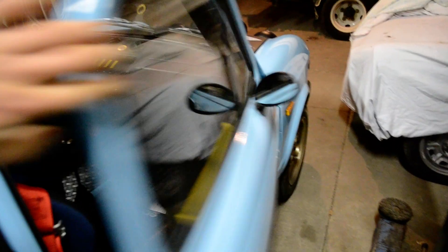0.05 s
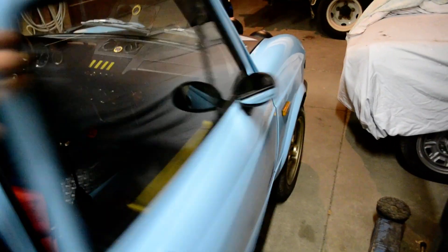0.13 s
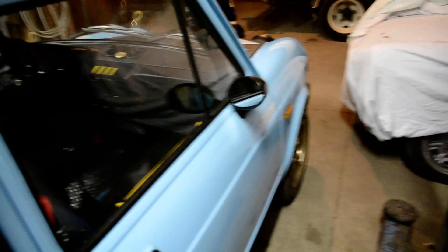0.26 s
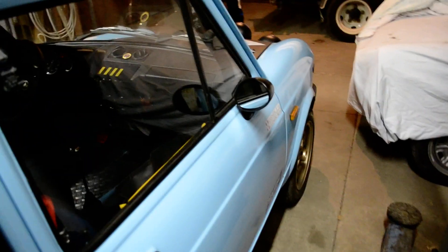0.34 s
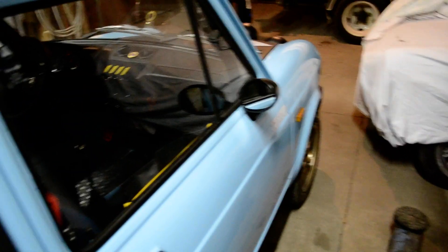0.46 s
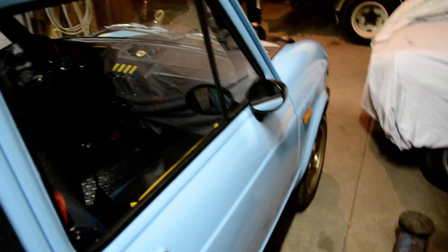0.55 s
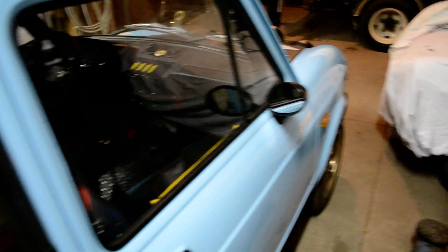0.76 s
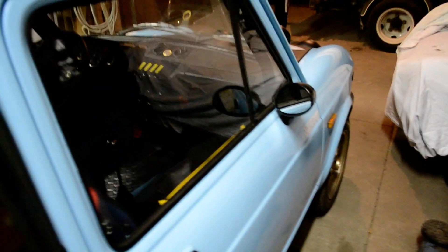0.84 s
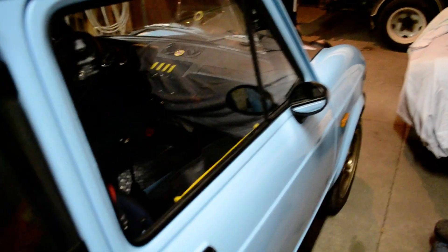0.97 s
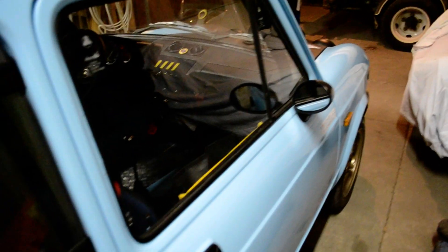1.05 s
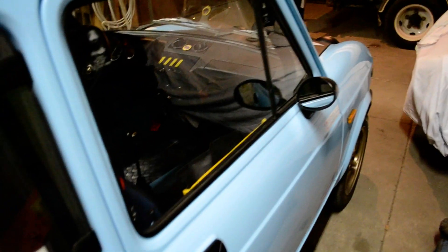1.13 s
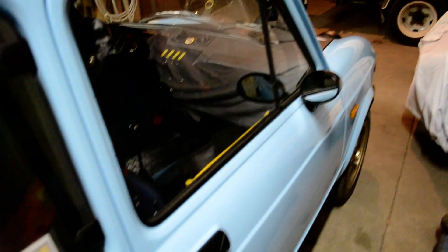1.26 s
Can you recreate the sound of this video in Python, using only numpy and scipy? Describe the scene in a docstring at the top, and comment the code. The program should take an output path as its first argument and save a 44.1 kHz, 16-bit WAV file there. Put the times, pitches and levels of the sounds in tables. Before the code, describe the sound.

One hard slam of a thin steel car door in a garage, close microphone clipping on the peak; rattling trim, boxy ringing body and short reverberation, then near silence with tiny clicks and cloth movement.

```python
"""Car door slam in a garage

A light steel car door is slammed in a concrete garage, heard close by. Seal rub is stick-slip pulses and hiss;
blows, glass and trim rattles and ticks are decaying noise bursts; latch and panels are decaying sines.
Body shudder is noise dying at a different speed per frequency; decaying noise rings out the garage.
One small tick comes before the slam, more after it, with a rustle and crackle of someone shifting nearby,
over faint room hiss. Loud peaks clip."""
import sys
import numpy as np
from scipy import signal
from scipy.fft import rfft, irfft, next_fast_len
from scipy.io import wavfile
from scipy.ndimage import map_coordinates

SR = 44100
rng = np.random.default_rng(int(sys.argv[2]) if len(sys.argv) > 2 else 0)


def invert_db(level):
    """Linear amplitude ratio for a level in decibels (20 dB per decade), elementwise."""
    return 10 ** (np.asarray(level, dtype=float) / 20)


def log_audio(samples):
    """Write samples as a 16-bit WAV file to the path given in sys.argv[1]."""
    # one column per channel
    frames = np.atleast_2d(samples).T
    # limit to full scale, then quantise
    limited = np.clip(frames, -1, 1)
    pcm = np.round(limited * 32767).astype(np.int16)
    wavfile.write(sys.argv[1], SR, pcm)


N = 57330
T = np.arange(N) / SR


def unit(x):
    """Scale to rms 1."""
    return x / np.sqrt(np.mean(x ** 2) + 1e-20)


def along(points, hz):
    """Interpolate (Hz, value) points on a log frequency axis."""
    f, v = np.transpose(points)
    return np.interp(np.log(hz + 1), np.log(f + 1), v)


def filtered(x, response):
    """Multiply the spectrum of x by a response of frequency, zero-padded."""
    m = next_fast_len(N + SR // 2)
    return irfft(rfft(x, m) * response(np.fft.rfftfreq(m, 1 / SR)), m)[:N]


def shaped(x, spectrum):
    """Filter x by (Hz, dB) points."""
    return filtered(x, lambda hz: invert_db(along(spectrum, hz)))


def noise(spectrum):
    """Coloured noise of rms 1."""
    return unit(shaped(rng.standard_normal(N), spectrum))


def grainy(spectrum, grain_db):
    """Coloured noise of rms 1 whose level flickers within milliseconds."""
    flicker = map_coordinates(rng.standard_normal(600), [T * 400])  # 400 random points a second
    return unit(invert_db(grain_db * flicker) * noise(spectrum))


def level(rows):
    """Gain per sample from (s, dB) rows, -150 dB before the first."""
    s, db = np.transpose(rows)
    return invert_db(np.interp(T, s, db, left=-150))


def build_up(rise_s):
    """Exponential approach to 1 with time constant rise_s."""
    return 1 - np.exp(-T / rise_s)


def dying(s, db, t60, rise_s=0.00037):
    """Quick rise at s, then exponential decay."""
    t = np.maximum(T - s, 0)
    return invert_db(db - 60 * t / t60) * (1 - np.exp(-t / rise_s))


def tail(x, t60s):
    """Make each frequency of x die at its own speed from the first sample."""
    hz, t, z = signal.stft(x, SR, nperseg=512)
    decay = invert_db(-60 * t / along(t60s, hz)[:, None])
    return signal.istft(z * decay, SR, nperseg=512)[1][:N]


# Blows of door on frame. Each row: start in seconds, level in dB, t60 in seconds.
BLOWS = [(0.2094, -2, 0.036), (0.2177, -15, 0.018), (0.2247, -13, 0.066), (0.2294, -18.5, 0.01),
         (0.241, -17, 0.11), (.2600, -19.5, 0.066)]
# Colour of the blows. Each row: frequency in Hz, relative level in dB.
STRIKE_SPECTRUM = [(30, -28.5), (200, -15), (487, -10), (800, -2), (1180, -1.5), (1500, -3.5), (1850, -3.5),
                   (2400, -5.5), (2800, -7.5), (3500, -7), (4400, -13.5), (9900, -30), (12000, -48.5)]


def blows():
    """Door striking frame: broadband bursts, each with its own decay."""
    return noise(STRIKE_SPECTRUM) * sum(dying(*row) for row in BLOWS)


def from_first_blow(x):
    """Delay x to the first blow."""
    start = round(BLOWS[0][0] * SR)
    return np.pad(x, (start, 0))[:N]


# Short latch modes. Each row: frequency in Hz, level in dB, t60 in seconds.
LATCH_MODES = [(992, -17, .06), (1207, -9, 0.078), (1720, -10, 0.031), (1959, -12.5, .05), (2402, -12, .05),
               (3343, -8.5, .04), (3646, -23.5, .035)]


def latch():
    """Latch struck at the first blow: brief metallic modes as decaying sines."""
    ring = np.zeros(N)
    for hz, db, t60 in LATCH_MODES:
        envelope = dying(BLOWS[0][0], db + rng.normal(0, 1), t60)
        ring += envelope * np.sin(2 * np.pi * (hz * T + rng.uniform()))
    return ring


# Rattles of glass and trim. Each row: start in seconds, level in dB, t60 in seconds.
RATTLES = [(0.209, -20, 0.026), (0.227, -14.5, 0.01), (0.2386, -11, 0.026), (0.245, -22, 0.046),
           (0.257, -22, 0.028), (0.274, -26, 0.04), (0.312, -25.5, 0.048), (0.329, -28.5, 0.042)]
# Colour of the rattles. Each row: frequency in Hz, relative level in dB.
TRIM_SPECTRUM = [(2500, -26.5), (4000, 2), (5500, 4), (7500, 0), (9500, -2.5), (11500, -21.5),
                 (13000, -52.5)]


def rattles():
    """Loose glass and trim: bright decaying bursts."""
    return noise(TRIM_SPECTRUM) * sum(dying(*row) for row in RATTLES)


# Colour of the body vibration. Each row: frequency in Hz, relative level in dB.
SHUDDER_SPECTRUM = [(15, -51.5), (25, -25.5), (223, -7), (304, -7), (448, -4), (509, -11), (550, -5.5),
                    (1460, -10), (7050, -22.5), (10100, -28.5), (11800, -52), (15300, -81), (22000, -120)]
# Decay of the body vibration. Each row: frequency in Hz, t60 in seconds.
SHUDDER_T60 = [(40, 0.55), (120, .8), (400, 0.56), (1500, 0.61), (4000, 0.23), (7000, 0.2), (11000, .33)]


def shudder():
    """Dense body modes after the first blow: noise with frequency-dependent decay."""
    level_db, rise_s = -13, 0.018
    vibration = invert_db(level_db) * tail(noise(SHUDDER_SPECTRUM), SHUDDER_T60)
    return from_first_blow(vibration * build_up(rise_s))


# Long panel and cabin modes. Each row: frequency in Hz, level in dB, t60 in seconds.
PANELS = [(32.5, -47.5, 1.5), (52, -49, 1.8), (92, -45.5, 0.6), (104.4, -45, 1.7), (113.7, -47, 1.4),
          (134, -32.5, 0.98), (198.9, -23.5, 0.32), (233.3, -32.5, .6), (348.4, -38, 1.28),
          (383, -28.5, 0.083), (443.7, -17.5, 0.34), (569.6, -25, 0.6), (639, -27.5, 0.59),
          (757.4, -20.5, 0.42), (832, -33, .4), (983, -24.5, 0.17), (1150, -24, .25), (1210, -30, 0.088),
          (1700, -21, 0.34), (2320, -27.5, 0.41)]


def panels():
    """Panels and cabin ringing after the first blow: decaying sines of wandering phase."""
    rise_s, waver_rad = 0.029, 0.55
    modes = np.zeros(N)
    for hz, db, t60 in PANELS:
        wander = waver_rad * map_coordinates(rng.standard_normal(40), [T * 20])  # 20 random points a second
        modes += invert_db(db - 60 * T / t60) * np.sin(2 * np.pi * hz * T + wander)
    return from_first_blow(modes * build_up(rise_s))


# Seal rub before the door seats. Each row: time in seconds, level in dB.
RUB = [(.160, -75), (.166, -41), (.185, -36.5), (.200, -41), (.2075, -26.5), (.2095, -18.5), (.212, -75)]
# Colour of the rubber. Each row: frequency in Hz, relative level in dB.
SEAL_SPECTRUM = [(150, -35.5), (400, -14.5), (560, -6), (900, -4), (2000, -2.5), (2600, -10), (3660, -25.5),
                 (4700, -21), (5600, -30.5), (9500, -37), (12000, -60)]


def seal():
    """Rubber seal: uneven stick-slip pulses plus hiss, coloured by the rubber."""
    slips_hz, jitter_periods, spread_db = 373.2, 0.4, 8.4
    hiss_ratio = 0.79  # hiss rms over slip rms
    k = np.arange(int(N / SR * slips_hz) - 2) + 1
    slip_s = (k + jitter_periods * rng.uniform(-1, 1, len(k))) / slips_hz
    slips = np.zeros(N)
    slips[(slip_s * SR).astype(int)] = invert_db(rng.normal(0, spread_db, len(k)))
    rub = unit(slips) + hiss_ratio * rng.standard_normal(N)
    return level(RUB) * unit(shaped(rub, SEAL_SPECTRUM))


# Air push. Each row: time in seconds, level in dB.
PUSH = [(.165, -75), (.185, -51.5), (.2, -47.5), (.21, -35.5), (.225, -68.5)]
# Colour of the air push. Each row: frequency in Hz, relative level in dB.
GAP_SPECTRUM = [(60, -19), (130, -1.5), (230, -2.5), (550, 1), (900, -22.5)]


def gap_air():
    """Air squeezed from the door gap: a swell of low noise."""
    return level(PUSH) * noise(GAP_SPECTRUM)


# Ticks nearby. Each row: start in seconds, level in dB, centre in Hz, bandwidth over centre, t60 in seconds.
TICKS = [(0.14, -51.5, 4180, 1.15, .03), (.736, -56, 7470, 1.46, 0.053), (.760, -48, 1523, 0.55, 0.056),
         (0.7608, -59, 8100, 1.4, 0.066), (0.771, -52, 2200, 0.71, 0.027), (0.779, -52, 2117, .6, 0.036),
         (0.9932, -46.5, 3480, 2.3, 0.0077), (1.013, -51.5, 5520, 1.6, 0.019),
         (1.040, -56, 4510, 0.79, 0.016), (1.0673, -51, 1286, 1.65, 0.028), (1.132, -52, 1205, 1.67, .05),
         (1.165, -61, 8540, 0.82, .05), (1.176, -56.5, 7060, 1.4, 0.033), (1.228, -49.5, 7500, 1.6, .025)]


def ticks():
    """Faint clicks: each a noise burst through a broad resonance applied twice."""
    out = np.zeros(N)
    for s, db, hz, width, t60 in TICKS:
        def band(f):
            damping = 1j * f * hz * width
            return (damping / (hz * hz - f * f + damping)) ** 2
        click = unit(filtered(rng.standard_normal(N), band))
        out += dying(s, db, t60, rise_s=0.0001) * click
    return out


# Rustle nearby. Each row: time in seconds, level in dB.
RUSTLE = [(1.03, -86), (1.12, -79), (1.155, -90), (1.175, -61), (1.21, -66.5), (1.255, -59), (1.277, -47.5),
          (1.3, -46)]
# Colour of the cloth. Each row: frequency in Hz, relative level in dB.
CLOTH_SPECTRUM = [(290, -45), (500, -11), (895, -5), (1010, -26), (1120, -12), (1440, -2), (2060, 3),
                  (2830, 6.5), (3450, -2), (3940, 5.5), (5200, -10), (10100, -12), (11800, -42),
                  (15300, -72), (22000, -120)]


def rustle():
    """Swelling cloth stroke: grainy noise."""
    return level(RUSTLE) * grainy(CLOTH_SPECTRUM, grain_db=2.2)


# Thin crackle nearby. Each row: time in seconds, level in dB.
CRACKLE = [(.72, -87), (.74, -65), (.79, -76), (.82, -98), (.98, -90), (1.0, -66), (1.035, -67),
           (1.05, -87), (1.085, -66.5), (1.135, -66.5), (1.145, -91), (1.165, -69), (1.3, -66)]
# Colour of the crackle. Each row: frequency in Hz, relative level in dB.
FIZZ_SPECTRUM = [(2000, -23), (4500, 2), (7500, -5), (9500, -2), (11000, -14), (12500, -43)]


def crackle():
    """Thin high crackle: noise with deeper level flicker than the rustle."""
    return level(CRACKLE) * grainy(FIZZ_SPECTRUM, grain_db=3.5)


# Decay of the garage. Each row: frequency in Hz, t60 in seconds.
GARAGE_T60 = [(60, 2.6), (250, 0.77), (1000, 0.64), (3000, 0.61), (6000, 0.39), (11000, 0.25)]


def garage(x):
    """Diffuse answer of concrete walls: convolution with decaying noise of unit energy."""
    level_db, rise_s = -9, 0.018
    answer = tail(rng.standard_normal(N), GARAGE_T60) * build_up(rise_s)
    answer /= np.linalg.norm(answer)
    return invert_db(level_db) * signal.fftconvolve(x, answer)[:N]


# Colour of the room hiss. Each row: frequency in Hz, relative level in dB.
HISS_SPECTRUM = [(18, -73.5), (30, -37.5), (161, -17.5), (202, -5), (234, -13.5), (450, -12), (1000, -15),
                 (1110, -16), (3340, -22.5), (12000, -36), (15600, -69.5), (22000, -120)]


def hiss():
    """Faint room hiss: steady coloured noise."""
    level_db = -62
    return invert_db(level_db) * noise(HISS_SPECTRUM)


def scene():
    """Sum all sources, with blows, rattles, seal and ticks also through the garage."""
    sharp = blows() + rattles() + seal() + ticks()
    direct_only = latch() + shudder() + panels() + gap_air() + rustle() + crackle() + hiss()
    return (sharp + garage(sharp) + direct_only)[None]


# Microphone response. Each row: frequency in Hz, gain in dB.
MIC_RESPONSE = [(20, 0), (10500, -1), (11500, -11), (12200, -40.5), (13000, -81.5)]


def microphone(x):
    """Treble roll-off, then hard clipping at the input."""
    clip_top = 0.72  # of full scale
    return np.clip(shaped(x, MIC_RESPONSE), -clip_top, clip_top)


def top_cut(x):
    """Nothing passes above the cut-off."""
    return signal.sosfilt(signal.butter(12, 16300, fs=SR, output="sos"), x)


def record(dry):
    """Pick up by microphone, then band-limit."""
    top_hz = 16000
    mix = filtered(microphone(dry[0]), lambda hz: hz < top_hz)[None]
    return top_cut(mix)


dry = scene()
out = record(dry)
log_audio(out)
```